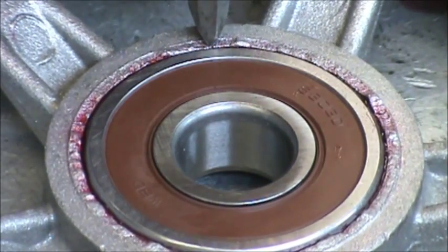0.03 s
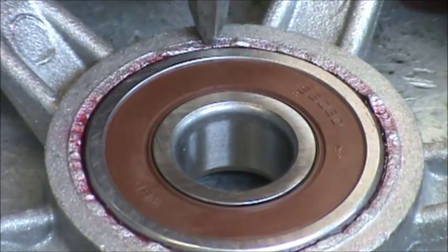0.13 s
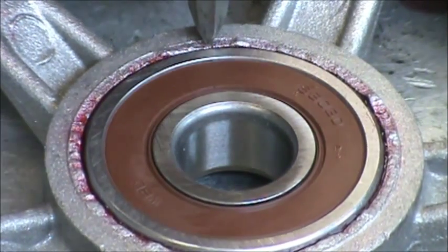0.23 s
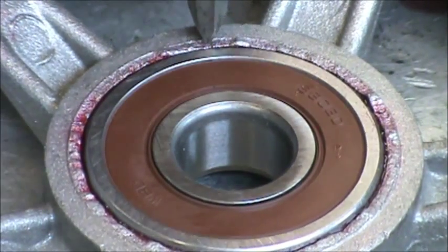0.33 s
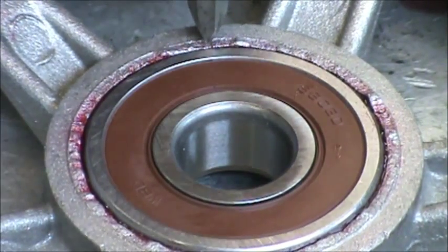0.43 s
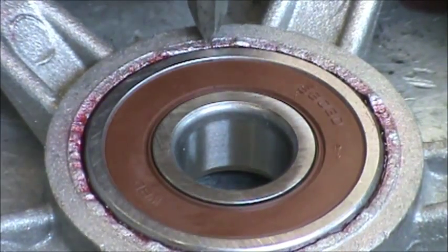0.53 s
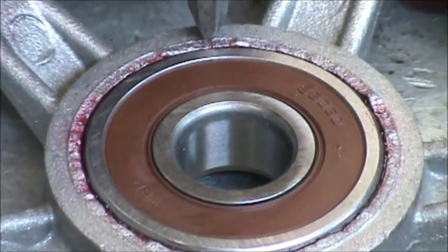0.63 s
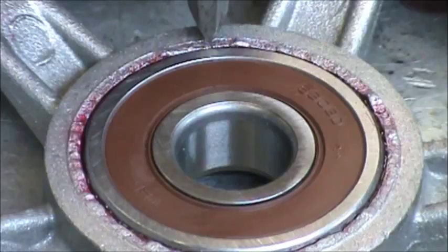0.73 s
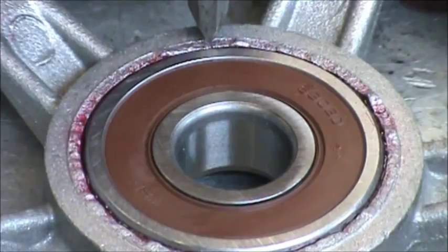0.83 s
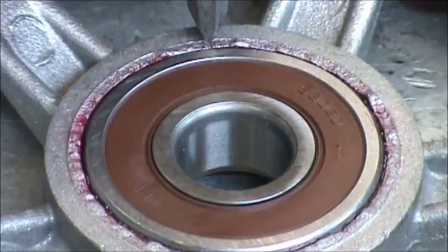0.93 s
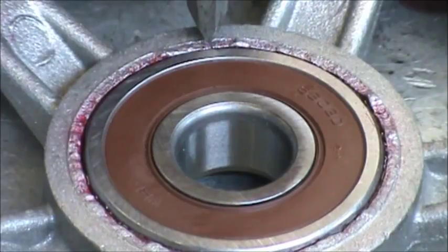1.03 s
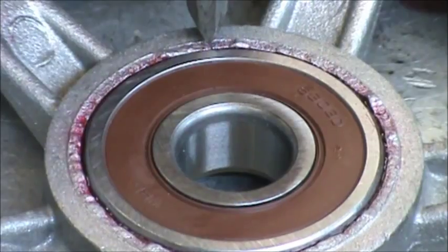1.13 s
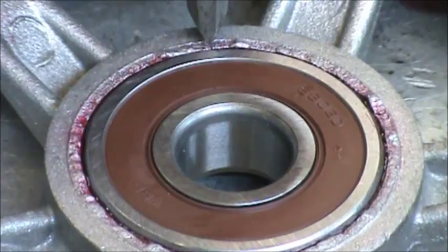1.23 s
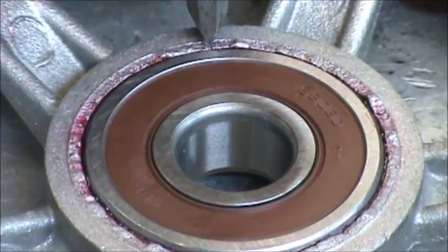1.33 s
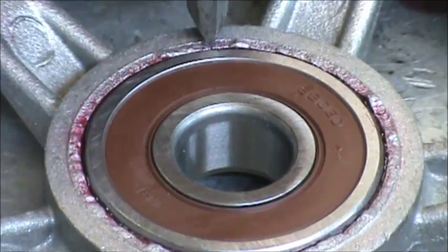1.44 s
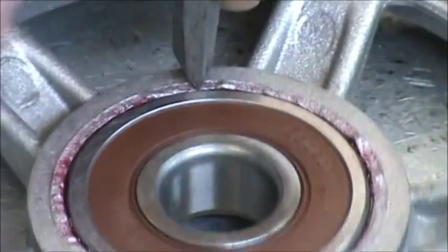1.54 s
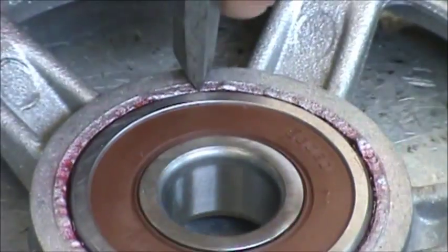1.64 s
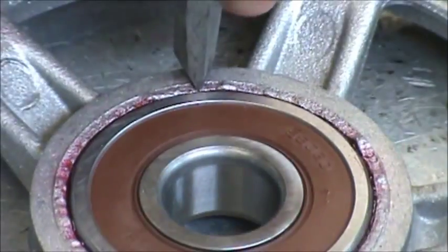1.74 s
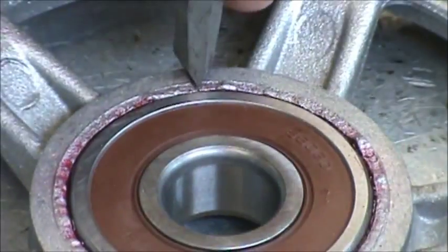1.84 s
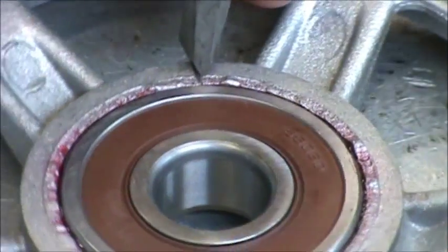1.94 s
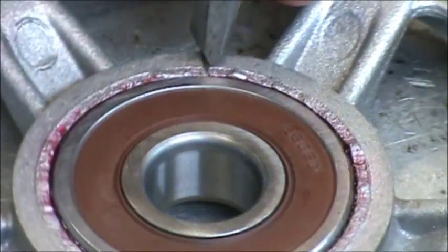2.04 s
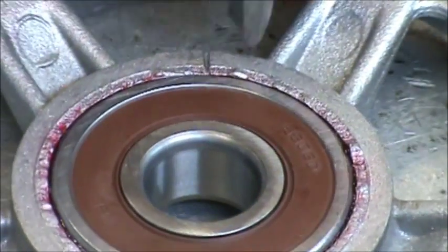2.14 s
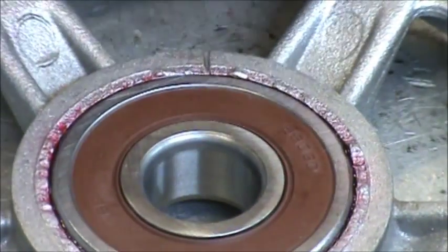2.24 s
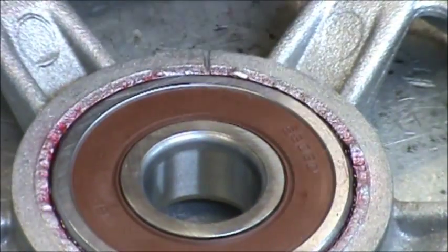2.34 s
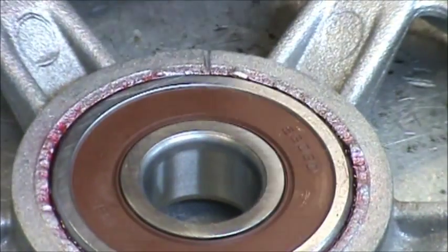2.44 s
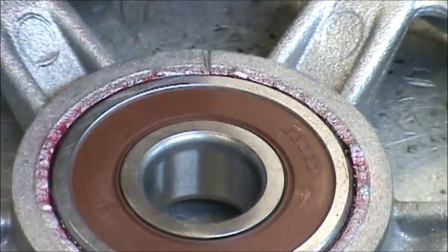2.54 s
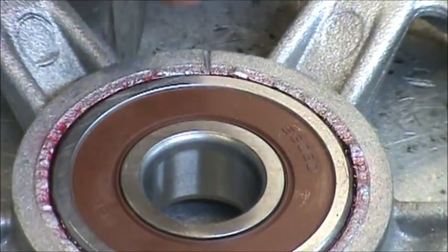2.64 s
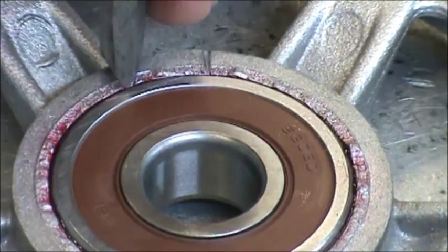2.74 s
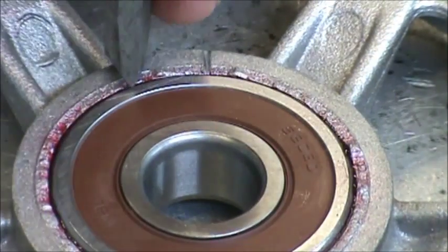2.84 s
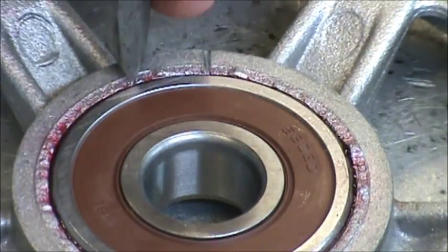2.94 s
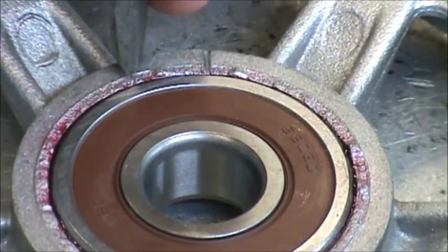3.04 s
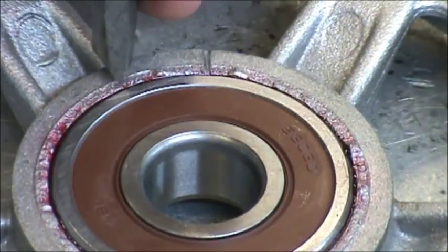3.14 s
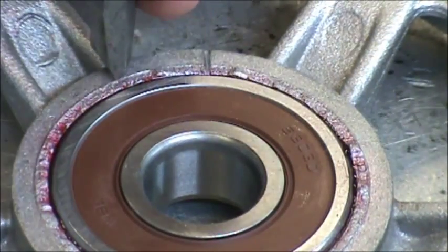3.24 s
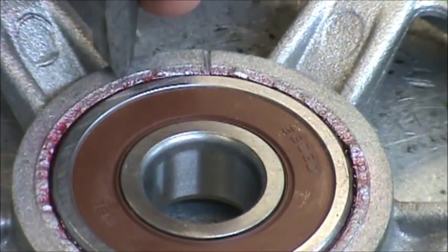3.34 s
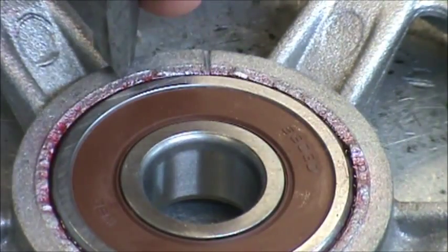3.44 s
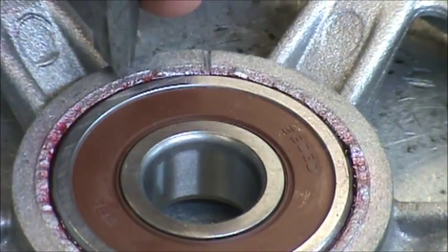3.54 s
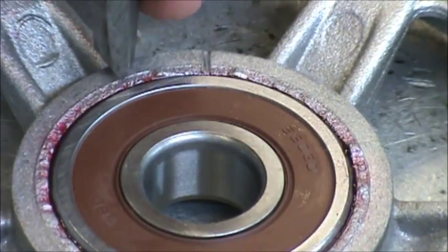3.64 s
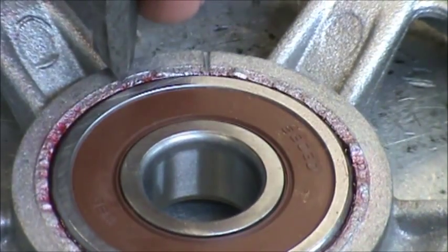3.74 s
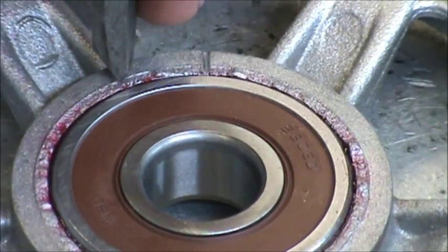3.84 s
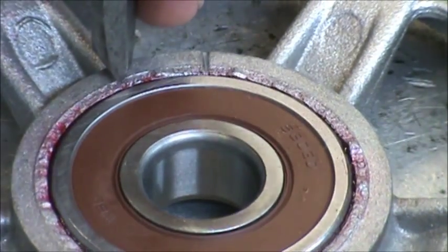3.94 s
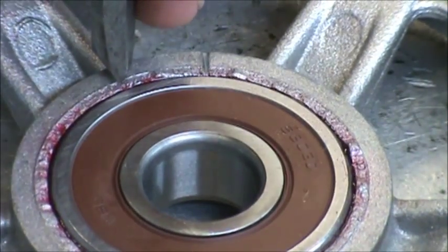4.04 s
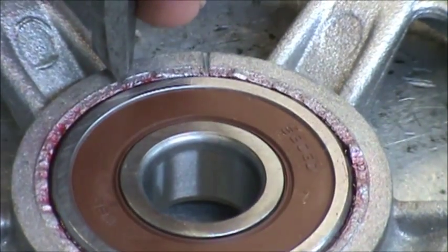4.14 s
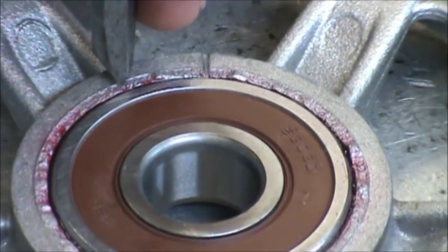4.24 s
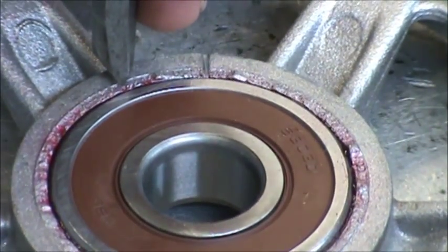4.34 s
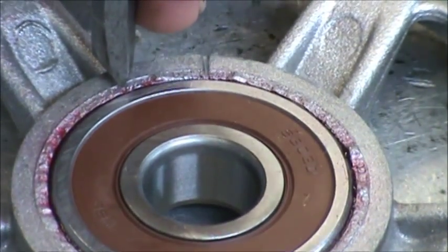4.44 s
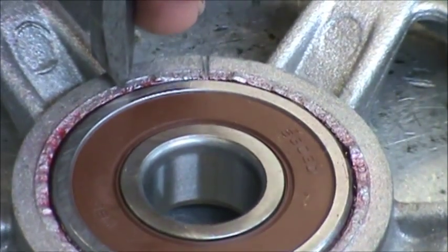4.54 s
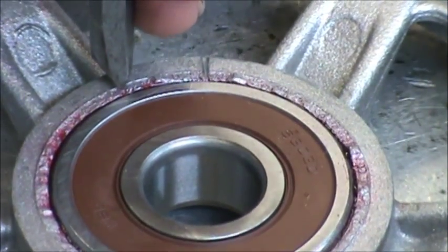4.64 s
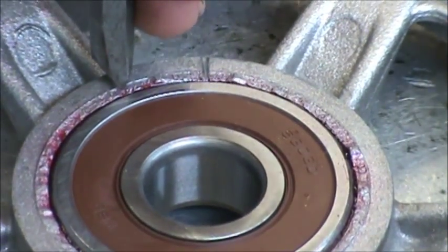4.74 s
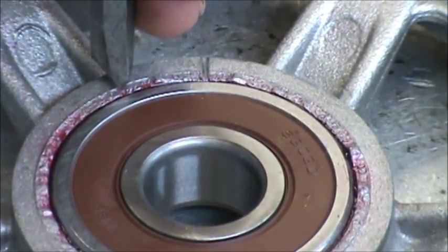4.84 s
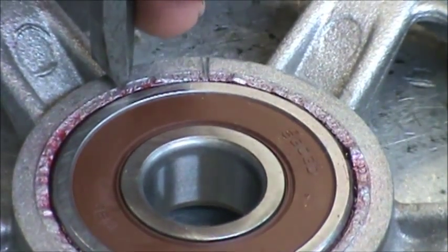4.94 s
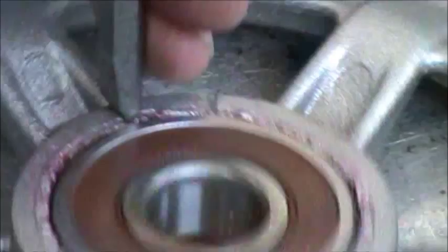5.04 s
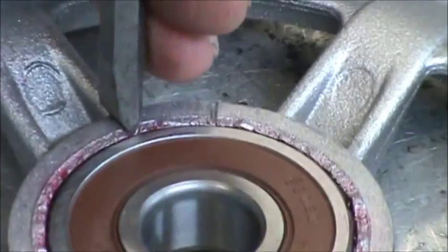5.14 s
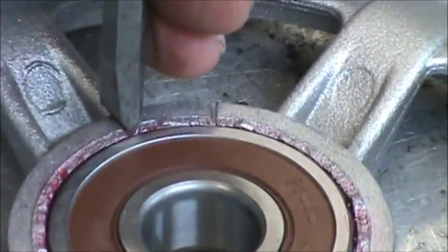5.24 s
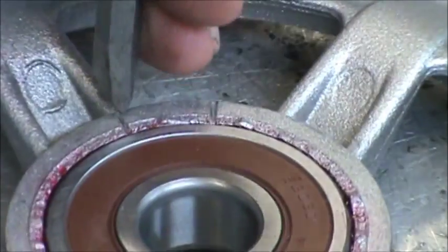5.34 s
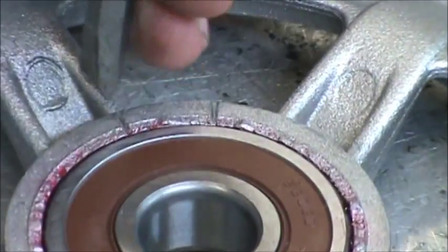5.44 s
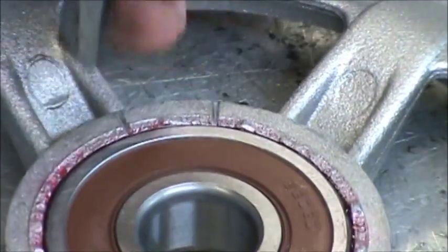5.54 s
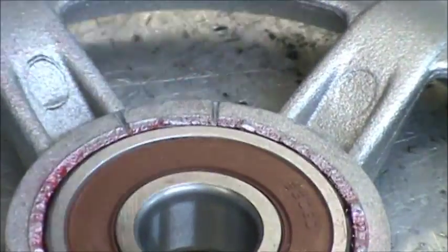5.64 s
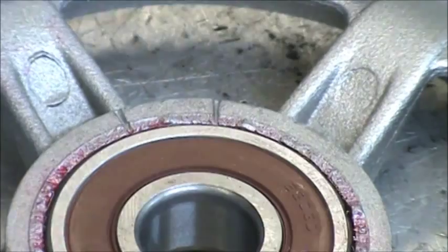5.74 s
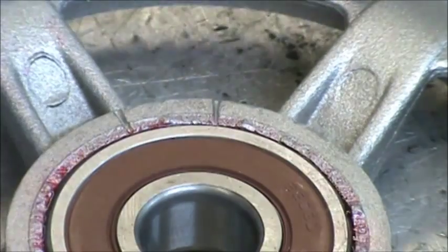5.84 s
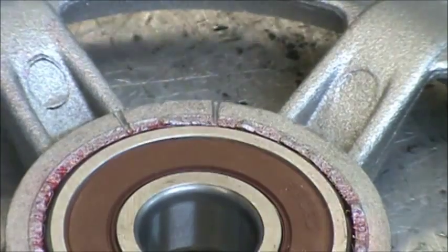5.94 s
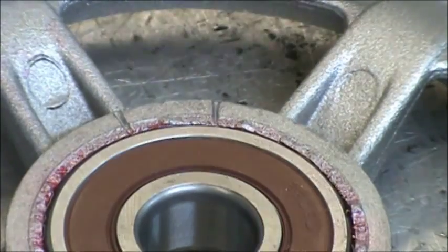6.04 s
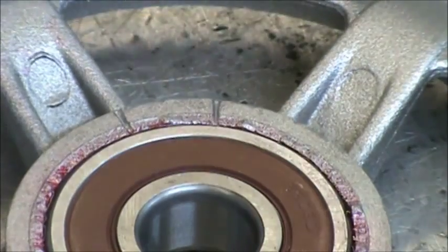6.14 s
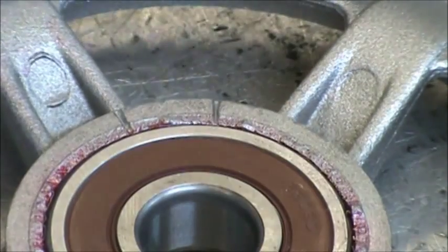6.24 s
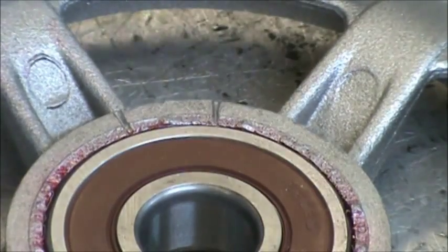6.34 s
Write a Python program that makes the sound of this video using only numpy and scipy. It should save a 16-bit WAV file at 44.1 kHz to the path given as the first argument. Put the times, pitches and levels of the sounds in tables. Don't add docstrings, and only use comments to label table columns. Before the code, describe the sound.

In a hard-walled workshop, a hammer drives a small chisel into a metal housing: two bursts of bright clanging blows, each ending with the hardest.

```python
import sys
import numpy as np
from scipy import signal
from scipy.fft import rfft, irfft, next_fast_len
from scipy.io import wavfile
from scipy.ndimage import uniform_filter1d

SR = 44100
rng = np.random.default_rng(int(sys.argv[2]) if len(sys.argv) > 2 else 0)


def waveform_to_disk(signal):
    frames = np.transpose(np.atleast_2d(signal))
    scaled = np.clip(frames, -1, 1) * 32767
    samples = np.round(scaled).astype(np.int16)
    wavfile.write(sys.argv[1], SR, samples)


def undo_db(level):
    steps = np.asarray(level, float) / 20
    return 10 ** steps


N = 281973
TAIL = 30000

# frequency in Hz, level in dB per Hz.
AIR_SPECTRUM = [(12, -30), (20, 2.5), (230, 0), (304, -5.5), (360, -4), (414, -5), (596, -7), (1040, -12.5),
                (1830, -13.5), (1990, -15), (3300, -20), (3690, -20), (4130, -22), (15700, -37),
                (15800, -70)]
# frequency in Hz, left-right likeness from 0 to 1.
AIR_LIKENESS = [(40, 1), (150, 1), (550, 1), (1650, 0.55), (5000, 0.67), (15000, 0.5)]
# frequency in Hz, level in dB re the air noise.
LAMP_HUM = [(120, -14), (240, -7.5), (360, -7.5), (480, -14.5), (600, -10.5), (840, -20), (2040, -16)]
# start in seconds, 3 kHz mode in dB, 4 kHz mode in dB, click in dB.
TOUCHES = [(0.596, -45.5, -36, -22), (1.916, -45, -29.5, -42), (2.1517, -34, -33, -43.5),
           (2.1578, -30, -25, -36), (2.775, -21.5, -30, -47), (3.156, -31.5, -44, -43),
           (5.586, -55, -47, -29.5), (5.621, -55.5, -61, -43), (5.710, -52, -57, -46),
           (5.763, -52, -55, -46), (5.850, -48, -57, -43), (5.896, -54, -55.5, -43), (6.025, -50, -55, -45)]
# start in seconds, peak in dB, pitch in Hz.
KNOCKS = [
    (0.597, -17.5, 820),
    (0.610, -21.5, 603),
    (0.630, -19, 610),
    (0.649, -26, 500),
    (6.219, -18.5, 800),
    (6.233, -12, 430),
    (6.243, -23, 445),
]
# start in seconds, end in seconds, level in dB.
SCUFFS = [
    (1.957, 2.12, -51.5),
    (3.1, 3.22, -51),
    (5.65, 6.1, -64),
]
# start in seconds, strength in dB, first chisel mode in dB, second chisel mode in dB,
# upper chisel modes in dB.
BLOWS = [
    (0.7136, -8, -2.5, 1, -11),
    (0.9483, -4, 1, 5.5, -25),
    (1.1366, -2, -4, -1.5, -1),
    (1.5230, 7.5, -3.5, -8, -1),
    (3.9977, -6.5, 4, 4.5, -8.5),
    (4.2297, -6, 9, 3, 0.5),
    (4.4640, -3.5, 5, 1, 2),
    (4.6341, -3, 2.5, 1, 0.5),
    (5.0450, 9, -7, -6, -4.5),
]
FIRST_HZ = [4174, 4232, 4095]
SECOND_HZ = [7854, 7800]
UPPER_HZ = [8845, 8226, 9370, 9800, 10160, 7095]
# level in dB, t60 in seconds.
FIRST_RING = [(-4, 0.2), (-25, 0.072), (-11.5, 0.096)]
SECOND_RING = [(-8, 0.2), (-14.5, 0.105)]
UPPER_RING = [(-8.5, 0.24), (-13, 0.11), (-11, 0.074), (-6.5, 0.045), (-17, 0.076), (-23, 0.19)]
HOUSING_HZ = [182, 236, 306, 365, 474, 687, 765, 1104, 1085, 1529, 2960, 2900, 3180, 4880, 6200]
# level in dB, t60 in seconds.
HOUSING_RING = [(-8.5, 0.43), (0.5, 0.17), (-7, 0.23), (-11, 0.18), (-9.5, 0.17), (-9, 0.28), (-13, 0.31),
                (-5, 0.2), (-11, 0.14), (-17.5, 0.3), (-8.5, 0.078), (-11, 0.059), (-13.5, 0.048),
                (-11, 0.032), (-14, 0.066)]
# frequency in Hz, level in dB per Hz.
LIGHT_CLATTER = [(130, -28), (180, -3), (450, 2), (800, -4), (1300, -17), (2000, -19.5), (2900, -15),
                 (3600, -23.5), (4800, -11.5), (6800, -26), (8500, -20), (10300, -31), (13500, -32),
                 (14500, -57)]
HARD_CLATTER = [(60, -28), (130, -9.5), (190, 4), (450, -2), (800, -7.5), (1300, -11), (2500, -20.5),
                (3100, -14), (3600, -18.5), (4300, -16.5), (7000, -19), (9500, -15.5), (12000, -27),
                (16000, -25)]
# frequency in Hz, t60 in seconds.
ROOM_T60 = [(100, 0.5), (260, 0.42), (700, 0.47), (1840, 0.57), (4850, 0.51), (10000, 0.4), (15000, 0.29)]
# frequency in Hz, left-right likeness from 0 to 1.
TAIL_LIKENESS = [(60, .8), (180, 1), (550, .9), (1650, 0.78), (5000, .9), (15000, 0.76)]
# corner in Hz, left then right.
PORT_HZ = [
    [197],
    [623],
]


def at_hz(points, hz):
    table = np.array(points, float)
    return np.interp(np.log(hz + 1), np.log(table[:, 0] + 1), table[:, 1])


def rms_one(x):
    return x / np.sqrt(np.mean(x ** 2) + 1e-20)


def fade(t, t60):
    return np.exp(-np.log(1000) * t / t60)


def add(track, sound, s):
    i = round(s * SR)
    track[..., i:i + sound.shape[-1]] += sound[..., :N - i]


def filtered(x, order, hz, kind):
    return signal.sosfilt(signal.butter(order, hz, kind, fs=SR, output="sos"), x)


def ports(hz):
    corner = np.array(PORT_HZ)
    return (1 - 1j * hz / corner) / (1 + 1j * hz / corner)


def stereo_noise(size, likeness, port_share):
    hz = np.fft.rfftfreq(size, 1 / SR)
    shared, apart = rfft(rng.standard_normal((2, size)))
    alike = np.clip(at_hz(likeness, hz), 0, 1)
    pair = np.sqrt(1 + alike) * shared + np.sqrt(1 - alike) * apart * [[1], [-1]]
    port_phase = port_share * np.angle(ports(hz))
    return hz, pair * np.exp(1j * port_phase) / np.sqrt(2)


def slow_gain_db(t):
    duck_db, duck_per_db, duck_s, recover_db_s = 9, 0.4036, 0.31, 3.5
    dips = []
    for s, strength_db, *_ in BLOWS:
        dips.append((t > s) * (duck_db + duck_per_db * strength_db - recover_db_s * (t - s)))
    deepest = np.maximum(np.max(dips, axis=0), 0)
    r = np.exp(-1 / (duck_s * SR))
    return -signal.lfilter([1 - r], [1, -r], deepest)


def shop_air():
    air_db, hiss_db, left_bass_db = -36, 4, 0.5
    t = np.arange(N) / SR
    hz, pair = stereo_noise(N, AIR_LIKENESS, port_share=0.3)
    lean_db = left_bass_db / (1 + hz / 300) * np.array([[1], [-1]])
    pair = pair * undo_db(at_hz(AIR_SPECTRUM, hz) + lean_db)
    air = irfft(pair, N)
    hiss = irfft(pair * np.clip(hz / 7000, 0, 1), N)
    top = irfft(pair * (hz > 11200), N)
    busy = sum((t > s) * (t < s + 0.3 + 0.01 * strength_db) for s, strength_db, *_ in BLOWS)
    dropout = uniform_filter1d(np.clip(busy, 0, 1.), size=2500)
    air = rms_one(air + hiss * (undo_db(hiss_db) - 1) - 0.95 * dropout * top)
    for hum_hz, hum_db in LAMP_HUM:
        phase = rng.uniform(0, 2 * np.pi) + np.array([[0], [0.9]])
        air += undo_db(hum_db) * np.sin(2 * np.pi * hum_hz * t + phase)
    return undo_db(air_db + slow_gain_db(t)) * air


def dying_noise(colour, rise_cycles):
    t = np.arange(TAIL) / SR
    hz, pair = stereo_noise(TAIL, TAIL_LIKENESS, port_share=0.99)
    out, centres = 0, np.array([120, 400, 1500, 5000, 10000, 15000])
    for k, centre in enumerate(centres):
        share = np.interp(np.log(hz + 1), np.log(centres), np.arange(6) == k)
        swell = 1 - np.exp(-t * centre / rise_cycles)
        band = irfft(pair * colour * share, TAIL)
        out = out + band * swell * fade(t, at_hz(ROOM_T60, centre))
    return out


def workshop(dry, wet_db):
    size = next_fast_len(N + TAIL)
    hz = np.fft.rfftfreq(size, 1 / SR)
    tail = dying_noise(1, rise_cycles=3.0)
    unit_tail = tail / np.sqrt(np.sum(tail ** 2) / 2)
    response = ports(hz) + undo_db(wet_db) * rfft(unit_tail, size)
    return irfft(rfft(dry, size) * response, size)[:, :N]


def struck(pitches, modes, spread_db, seconds=0.35):
    t = np.arange(int(seconds * SR)) / SR
    hz = np.array(pitches)[:, None]
    level_db, t60 = np.transpose(modes)[:, :, None]
    louder, sign, detune = rng.standard_normal((3, len(modes), 1))
    turns = 2 * np.pi * hz * (1 + 0.0007 * detune) * t
    level = undo_db(level_db + spread_db * louder) * np.sign(sign)
    return np.sum(level * fade(t, t60) * np.sin(turns), axis=0)


def steel_touch(low_db, high_db, click_db):
    t60 = 0.026
    modes = [(low_db, t60), (high_db, t60), (low_db - 11.5, t60), (high_db - 16, 0.02)]
    tick = struck([2924, 3920, 1140, 5470], modes, spread_db=0.5, seconds=0.15)
    t = np.arange(200) / SR
    add(tick, rng.standard_normal(200) * undo_db(click_db - 60 * t / 0.0055), 0)
    return tick


def bench_knock(peak_db, hz):
    t = np.arange(3000) / SR
    burst = rng.standard_normal(3000) * undo_db(-60 * t / 0.076)
    return undo_db(peak_db + 2) * filtered(burst, 2, [hz / 5, hz * 3], "band")


def finger_scuffs():
    t = np.arange(N) / SR
    rub = filtered(rng.standard_normal(N), 1, [2500, 12000], "band")
    out = np.zeros(N)
    for start, end, level_db in SCUFFS:
        out += undo_db(level_db) * rub * np.sin(np.pi * np.clip((t - start) / (end - start), 0, 1))
    return out


def handling():
    out = finger_scuffs()
    for s, low_db, high_db, click_db in TOUCHES:
        add(out, steel_touch(low_db, high_db, click_db), s)
    for s, peak_db, hz in KNOCKS:
        add(out, bench_knock(peak_db, hz), s)
    return workshop(out, wet_db=-11.0)


def crack(hardness):
    t = np.arange(1200) / SR
    noise = rng.standard_normal(1200) * undo_db(-1.5 * hardness - 60 * t / 0.028)
    edge_hz = 4500 + 6500 * hardness
    return filtered(noise, 3, [1500, edge_hz * 1.08], "band")


def blow(strength_db, first_db, second_db, upper_db):
    hz = np.fft.rfftfreq(TAIL, 1 / SR)
    hardness = np.clip(0.49 + 0.2 * strength_db, 0, 1)
    ring = undo_db(first_db) * struck(FIRST_HZ, FIRST_RING, 0.92)
    ring += undo_db(second_db) * struck(SECOND_HZ, SECOND_RING, 0.53)
    ring += undo_db(upper_db) * struck(UPPER_HZ, UPPER_RING, 1.4)
    ring += undo_db(-5 * hardness) * struck(HOUSING_HZ, HOUSING_RING, 1.5)
    add(ring, crack(hardness), 0)
    direct = rfft(ring, TAIL)
    clatter = undo_db((1 - hardness) * at_hz(LIGHT_CLATTER, hz) + hardness * at_hz(HARD_CLATTER, hz))
    colour = np.hypot(undo_db(-0.5 + 4.7 * hardness) * rms_one(clatter), undo_db(-31.5) * abs(direct))
    heard = irfft(direct * ports(hz), TAIL) + dying_noise(colour, rise_cycles=5.1)
    return undo_db(strength_db - 3.5) * heard


def hammer():
    out = np.zeros((2, N))
    for s, *blow_db in BLOWS:
        add(out, blow(*blow_db), s)
    return filtered(out, 2, 110, "high")


def scene():
    return shop_air() + handling() + hammer()


def low_pass(x):
    return signal.sosfilt(signal.butter(12, 16460, fs=SR, output="sos"), x)


def record(dry):
    limit_db, release_db_s, attack_s = -8.5, 121, 0.0013
    t = np.arange(N) / SR
    r = np.exp(-1 / (attack_s * SR))
    power = signal.lfilter([1 - r], [1, -r], np.mean(dry ** 2, axis=0))
    over_db = np.maximum(10 * np.log10(power + 1e-12) - limit_db, 0)
    held_db = np.maximum.accumulate(over_db + release_db_s * t) - release_db_s * t
    rounded = 1.068 * np.tanh(dry * undo_db(-held_db) / 1.046)
    mix = signal.sosfilt(signal.cheby2(12, 70, 16400, fs=SR, output="sos"), rounded)
    return low_pass(mix)


dry = scene()
out = record(dry)
waveform_to_disk(out)
```